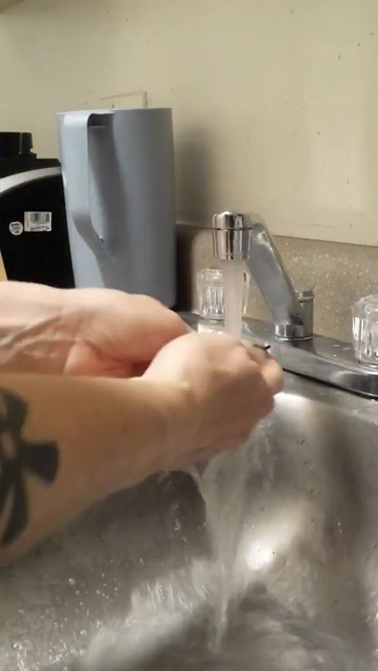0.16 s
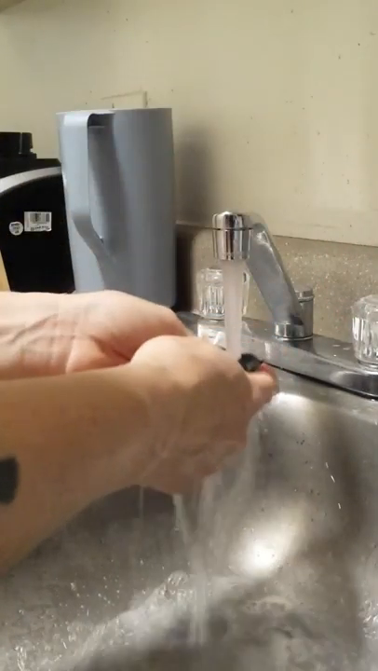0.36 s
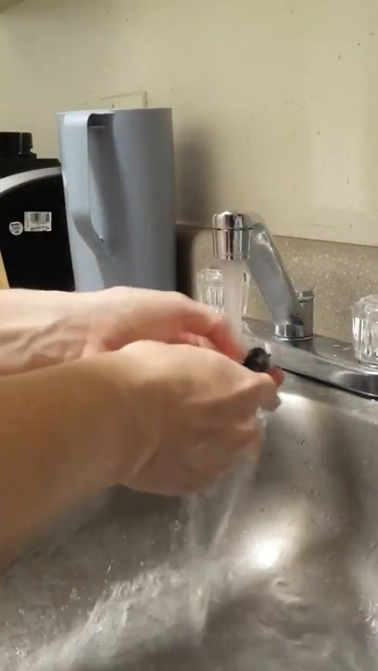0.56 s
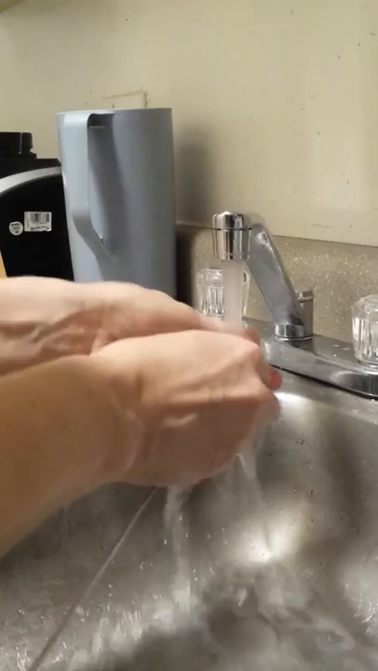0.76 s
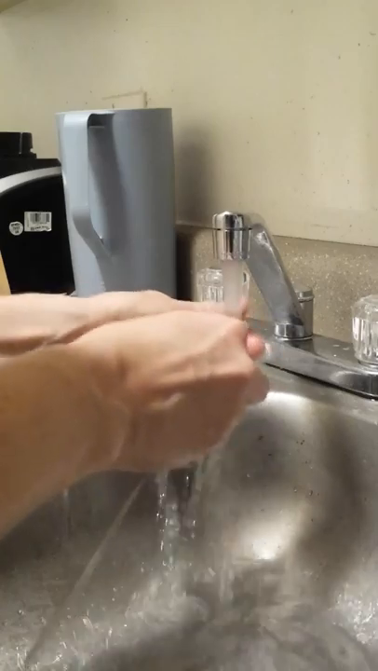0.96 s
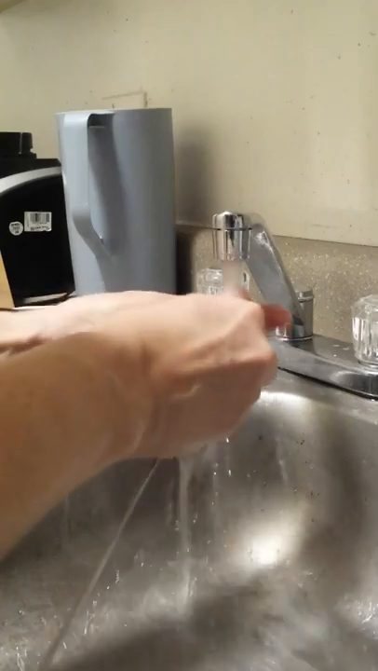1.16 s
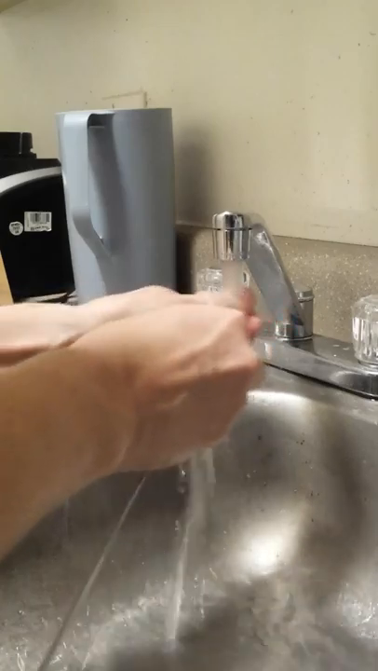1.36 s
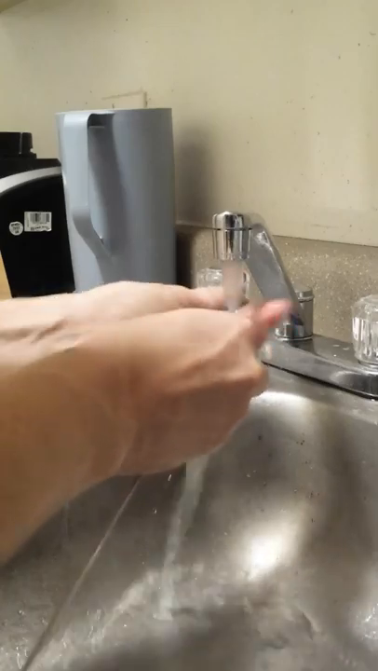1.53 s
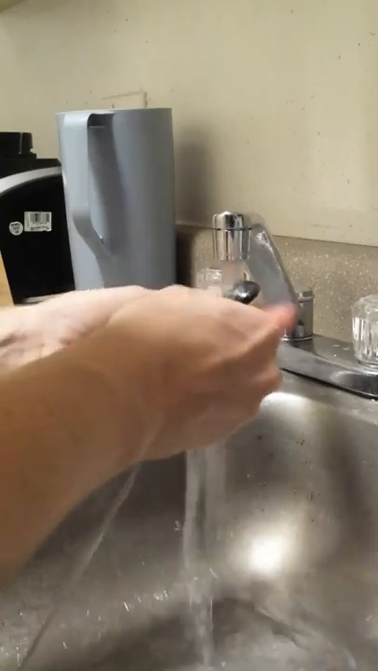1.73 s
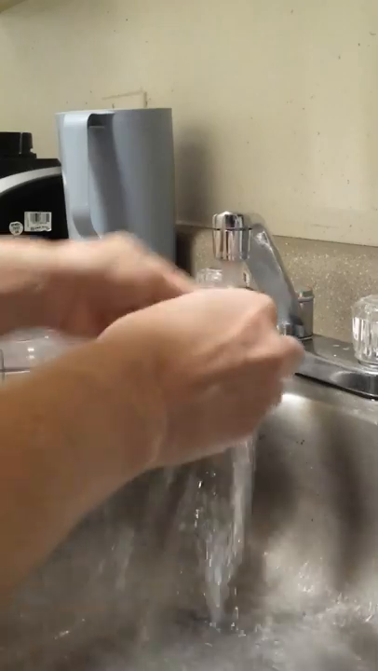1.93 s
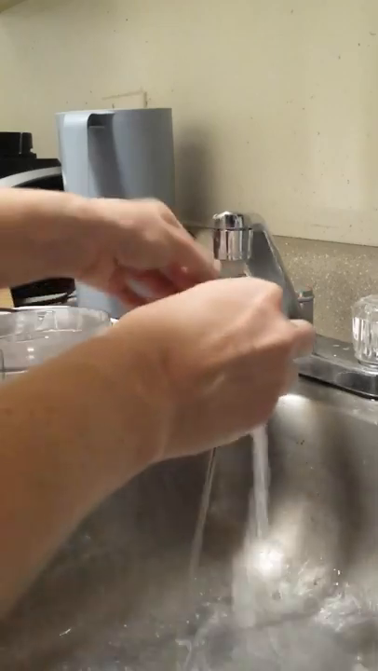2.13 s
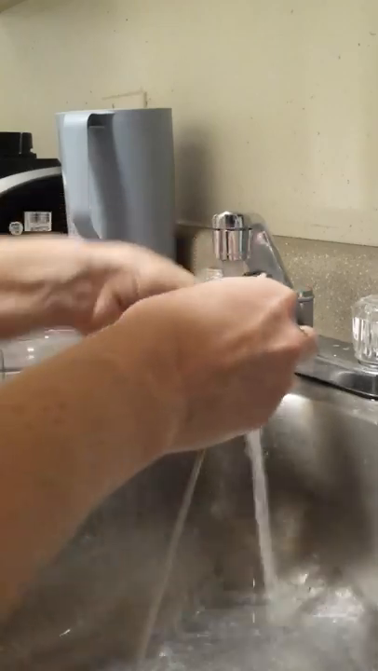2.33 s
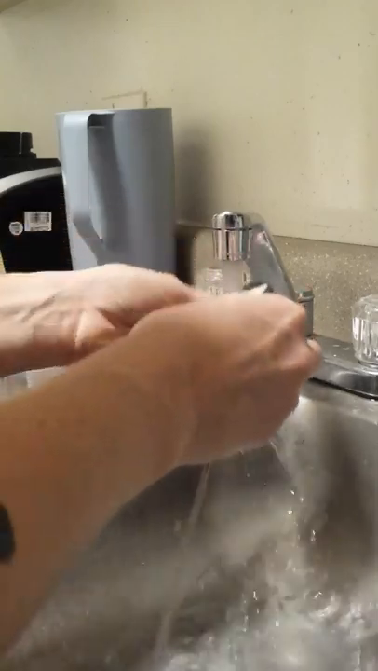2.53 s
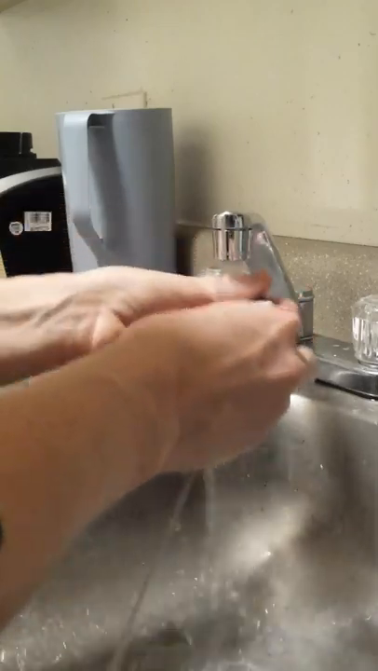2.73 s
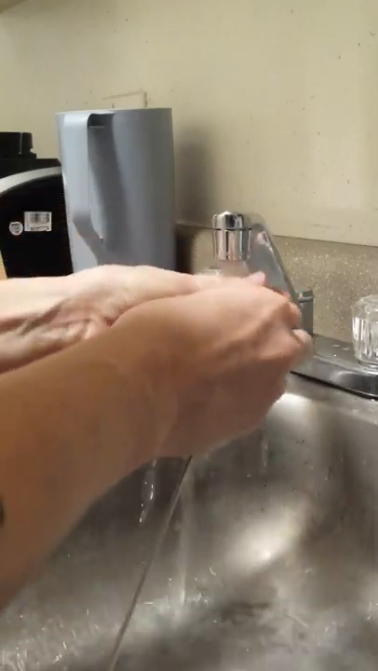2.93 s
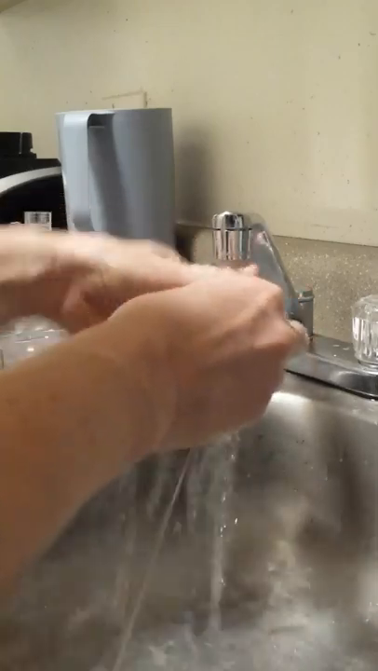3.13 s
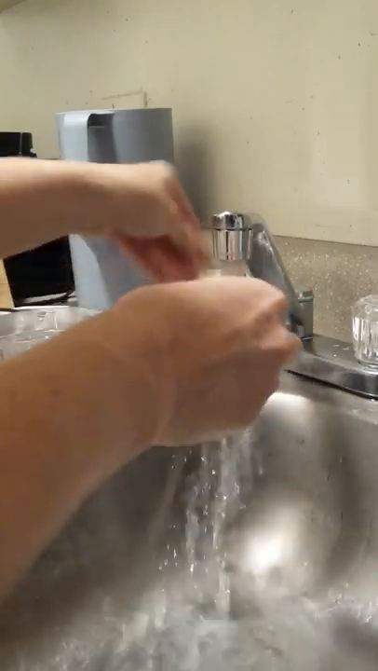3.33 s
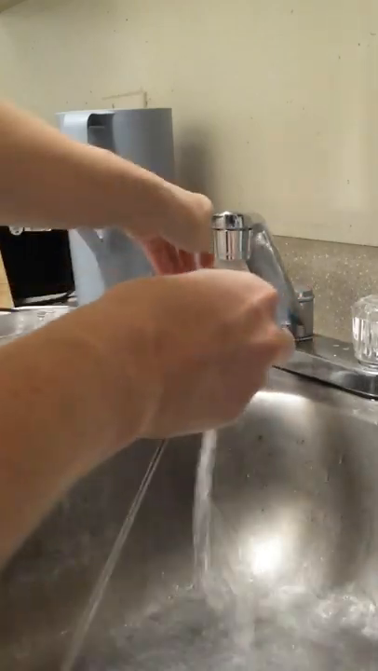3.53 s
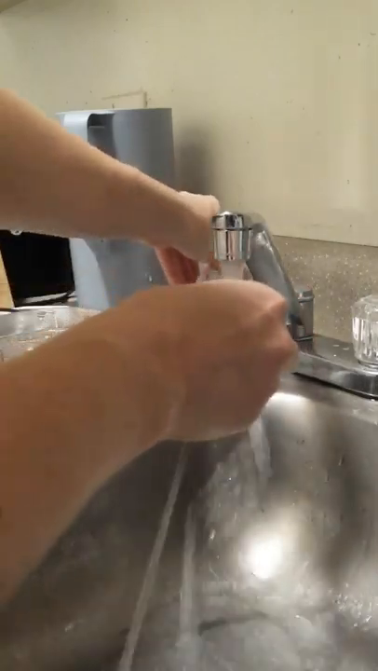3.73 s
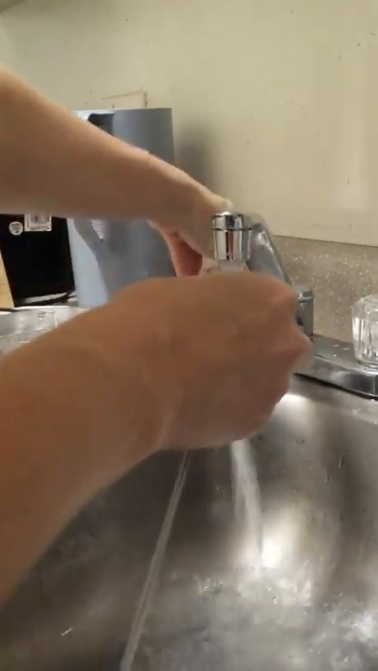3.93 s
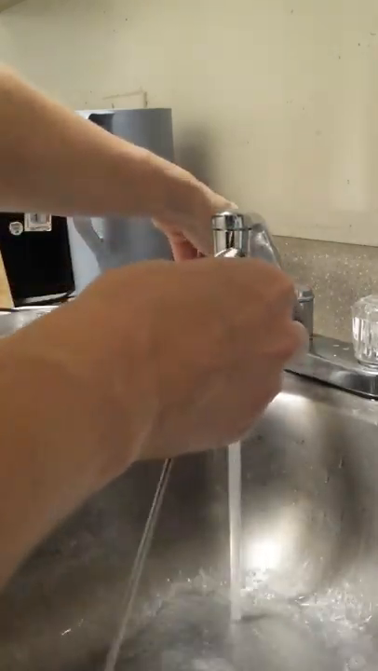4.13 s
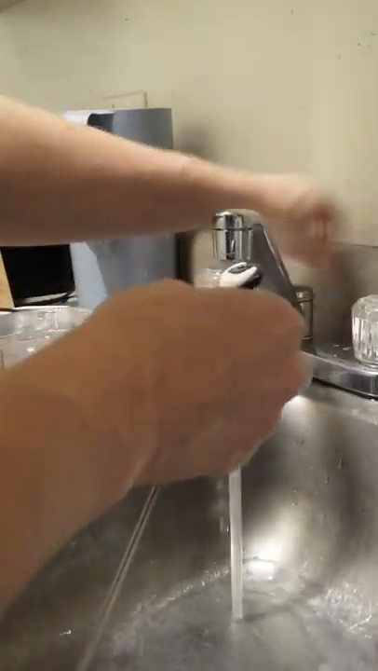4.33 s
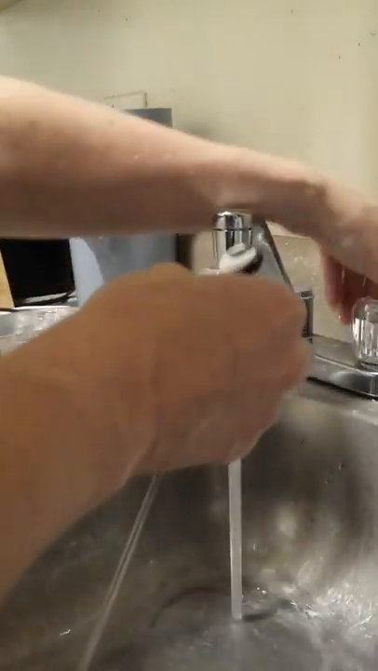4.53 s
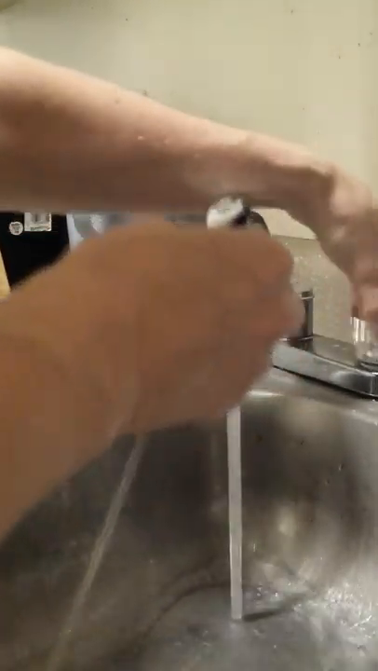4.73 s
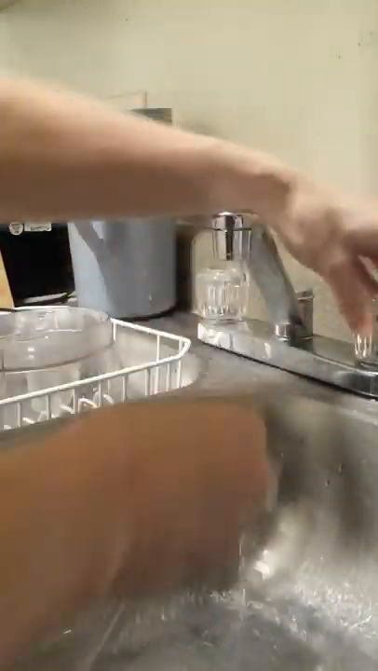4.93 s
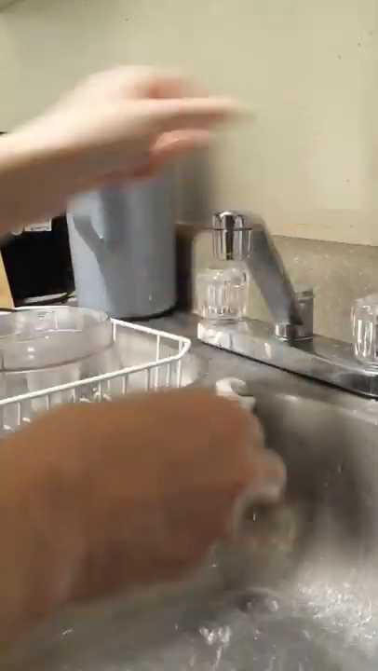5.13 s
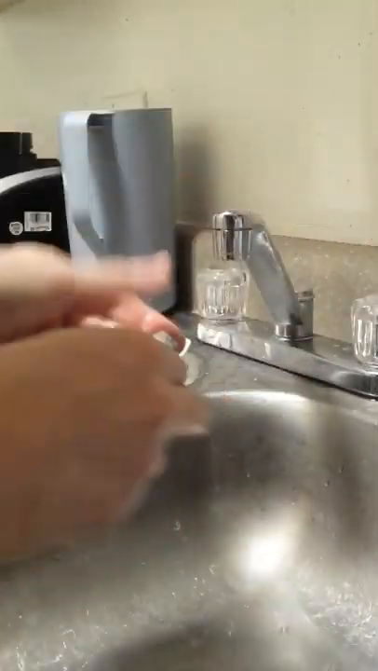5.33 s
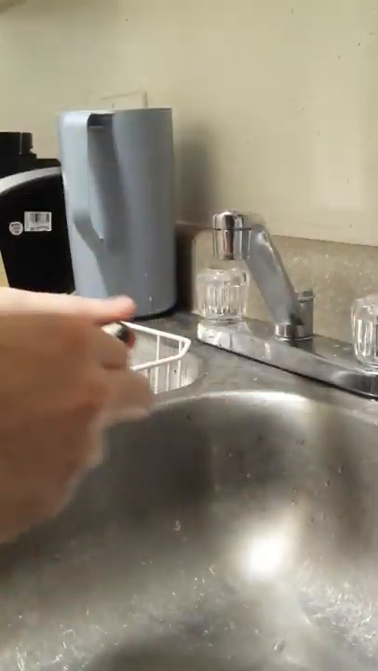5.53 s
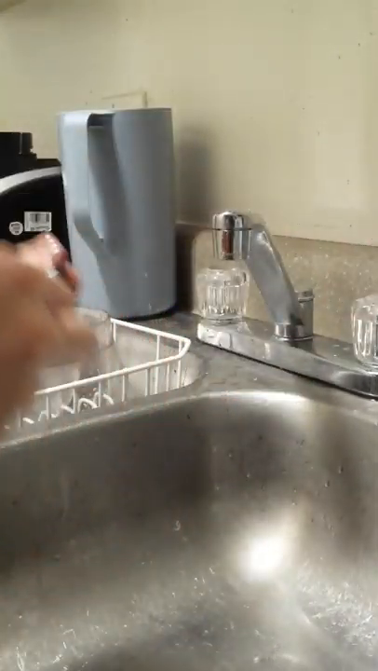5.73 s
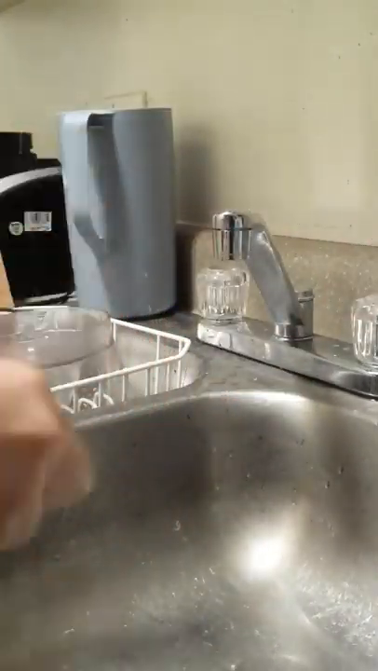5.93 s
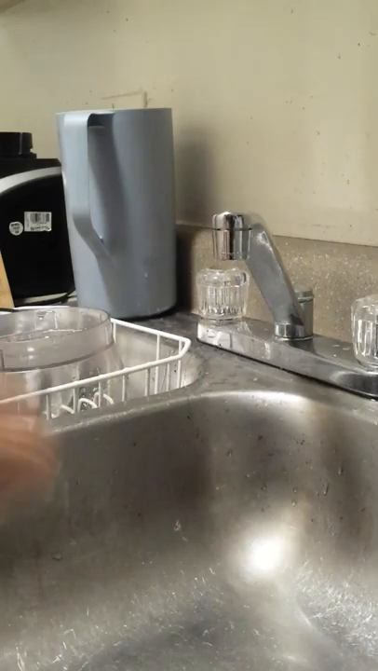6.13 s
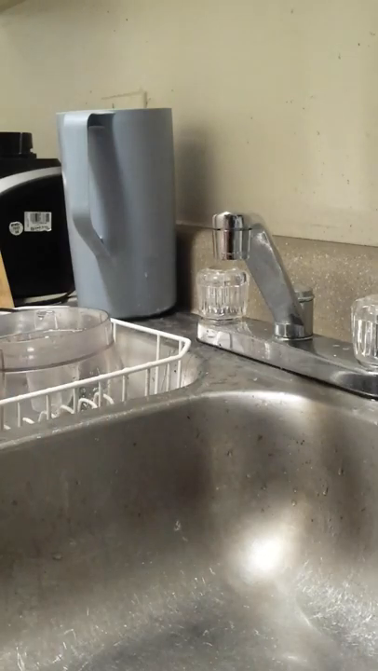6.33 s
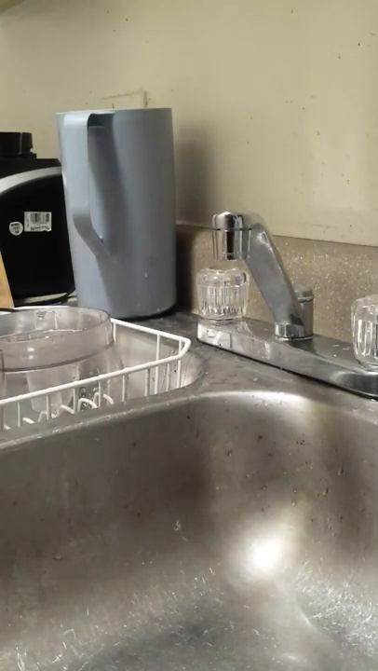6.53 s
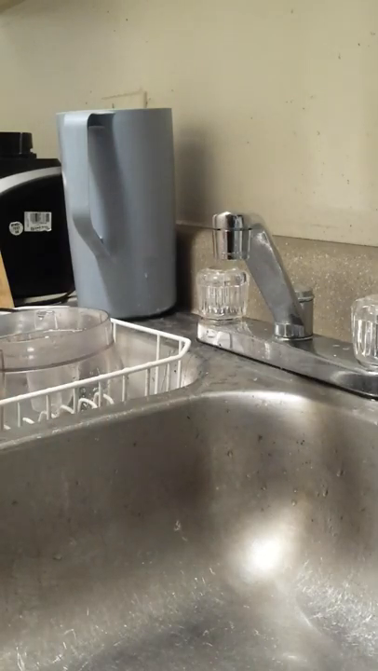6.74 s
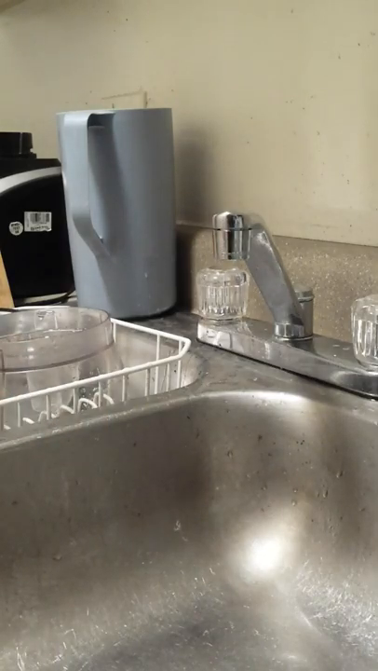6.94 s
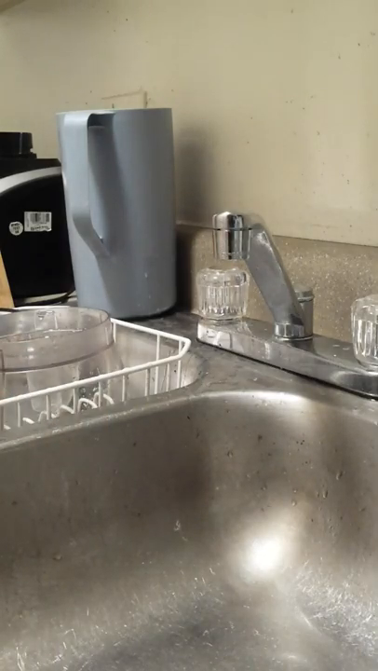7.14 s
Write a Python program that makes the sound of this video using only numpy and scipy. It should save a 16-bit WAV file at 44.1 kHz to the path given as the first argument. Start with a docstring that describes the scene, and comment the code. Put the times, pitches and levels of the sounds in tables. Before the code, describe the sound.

From the start, a kitchen tap pours loudly over hands rinsing small glass beads, breaking into crisp spray, irregular handfuls and sharp drops that slap a steel sink, with a low metallic drumming and little bubble plinks and gulps. From about 1.6 to 2.7 s the whole sound is turned down unevenly, with the splashing thinnest near 2.0 and 2.2 s, and it is full again by 3.0 s. From 3.3 s a freer stream adds a steady bright hiss; dull low knocks come at 3.7, 4.1, 4.3, 4.55 and 4.9 s. The water is shut off at about 4.95 s. A sharp tick and light clacks follow at 5.03 to 5.1 s, then a fizzing trickle fading by 6 s, sparse tiny drips, faint squeaks between 5.5 and 6 s, and a small clack at 6.9 s. A low, wavering appliance hum and soft room rush remain to 7.2 s. Close stereo, short basin reflections.

```python
"""A kitchen tap runs over two hands rinsing glass beads, filtered random drops surging into a steel sink.
Two microphone ports hear it directly, slightly later on the left, then off the basin and the kitchen.
Handfuls, drops and lumps fall as showers and cracks; trapped bubbles and dull knocks are damped sines.
The tap is shut after about five seconds; a sharp tick, small fizzing pings, drips and faint squeaks follow.
Wavering sine lines hum like an appliance over soft room noise; the recorder turns down at 1.6-2.7 s."""
import sys
import numpy as np
from scipy import signal
from scipy.fft import rfft, irfft, next_fast_len
from scipy.io import wavfile

SR = 44100
rng = np.random.default_rng(int(sys.argv[2]) if len(sys.argv) > 2 else 0)


def to_wav(s):
    """Save 16-bit WAV."""
    ch = np.atleast_2d(s).T  # columns
    pcm = np.round(np.clip(ch, -1, 1) * 32767)  # PCM
    wavfile.write(sys.argv[1], SR, pcm.astype(np.int16))


N = 316902
TIME = np.arange(N) / SR

# level of the running water over time, with the recorder turning down at 1.6-2.7 s: start_s, level_db
WATER_CURVE = [(0, 2), (1.2, 1.5), (1.55, -2.5), (1.73, -7.5), (1.92, -4.5), (2.22, -11.5), (2.62, -6),
               (3.0, 1), (3.5, 0), (3.85, -1), (4.1, 0.5), (4.65, 3), (4.92, -4)]
# handfuls of water that spill into the sink: start_s, level_db, length_s
HANDFULS = [(0.17, -21, 0.04), (0.458, -24.5, 0.057), (0.538, -23, 0.046), (0.768, -23.5, 0.023),
            (0.924, -20, 0.023), (1.096, -25, 0.033), (1.153, -21, 0.033), (1.327, -21.5, 0.037),
            (1.525, -28.5, 0.065), (1.604, -29.5, 0.056), (1.677, -23.5, 0.02), (1.802, -28.5, 0.053),
            (1.962, -29, 0.015), (2.054, -26, 0.071), (2.24, -30, 0.018), (2.405, -31, 0.12),
            (2.556, -30.5, 0.02), (2.641, -25, 0.016), (2.899, -26.5, 0.021), (2.974, -26.5, 0.035),
            (3.023, -23.5, 0.022), (3.245, -24.5, 0.058), (3.321, -18.5, .02), (3.365, -25, .03),
            (3.461, -20, 0.047), (3.499, -19.5, .022), (3.748, -22.5, .035), (4.257, -22.5, 0.022),
            (4.584, -23, 0.022), (4.734, -23, 0.037), (4.823, -25, 0.087), (4.926, -21, 0.032)]
# heavy single drops that slap the steel while the tap runs: start_s, level_db
HEAVY_DROPS = [(0.051, -2), (0.1030, 1), (0.464, -7), (0.3002, -2), (0.5435, -5), (0.6257, -1),
               (0.6681, -4), (0.7430, -4), (0.9063, 0), (0.9993, -2.5), (1.046, 2), (1.1445, -7),
               (1.174, -3), (1.27, 0), (1.3812, -1.5), (1.454, -0.5), (1.516, -12), (1.6022, 1.5),
               (1.682, -5.5), (1.7389, -15), (1.7814, -10), (2.4773, -8.5), (2.641, -2.5), (2.687, -1.5),
               (2.7372, -3), (2.8095, -8.5), (2.9503, -7), (3.3686, 2), (3.4281, -2), (3.578, -0.5),
               (3.7334, -3.5), (3.9962, -3), (4.0489, 3), (4.176, 1), (4.2423, -4.5), (4.305, -2),
               (4.3465, -7), (4.709, 0.5), (4.7978, 0), (4.8179, 1.5)]
# late drips, and at 5.03 s a sharp tick, perhaps a bead, with the clack: start_s, level_db
LATE_DRIPS_AND_TICK = [(5.0303, -10), (5.209, -14), (5.434, -20.5), (5.575, -23), (5.732, -21.5),
                       (5.77, -18.5), (5.8384, -22.5), (6.333, -28.5), (6.452, -23), (6.538, -21),
                       (6.667, -22), (7.047, -20)]
# the clearest bright bubbles: start_s, level_db, pitch_hz
BRIGHT_BUBBLES = [(0.101, -18.5, 3150), (0.233, -17, 4230), (0.345, -16.5, 3200), (0.55, -17.5, 3100),
                  (1.339, -17, 2820), (1.529, -21, 3640), (2.177, -29.5, 3240), (2.833, -12, 3380),
                  (3.324, -17, 3230), (3.477, -21.5, 2030), (3.504, -14, 4400), (5.23, -20.5, 3350),
                  (5.285, -31.5, 2830)]
# deep bubbles and gulps, and at 4.9 s the deep ring of the valve's thunk: start_s, level_db, pitch_hz
DEEP_BUBBLES = [(1.795, -28.5, 805), (2.335, -26, 1250), (3.028, -21, 785), (3.239, -18.5, 780),
                (3.282, -22.5, 750), (3.394, -17, 786), (4.03, -24.5, 930), (4.898, -15, 836),
                (6.04, -37.5, 794)]
# dull knocks of hand, valve and pipe: start_s, level_db, pitch_hz
DULL_KNOCKS = [(3.659, -25, 118), (4.075, -20.5, 85), (4.088, -19, 139), (4.319, -20, 150),
               (4.541, -22, 135), (4.585, -21, 156), (4.896, -16, 161)]
# light clacks of things being handled: start_s, level_db, t60_s
LIGHT_CLACKS = [(5.029, -40, 0.09), (5.064, -41.5, 0.11), (5.092, -46.5, 0.12), (6.881, -45, 0.35)]
# faint squeaks of wet beads and fingers: start_s, level_db, pitch_hz
BEAD_SQUEAKS = [(5.465, -51, 2950), (5.54, -49, 3450), (5.588, -45, 3720), (5.82, -48, 3340),
                (6.02, -53, 3530)]
# colour of the fine spray: pitch_hz, level_db (per Hz)
SPRAY_COLOUR = [(5000, -0.5), (7000, 10.5), (9000, 3.5), (11500, 3.5), (14500, 3)]
# colour of the coarser splashes: pitch_hz, level_db (per Hz)
SPLASH_COLOUR = [(1300, 0.5), (2000, -5), (2500, -10), (3100, 2.5), (4000, 0), (5000, -6)]
# colour of the drumming steel: pitch_hz, level_db (per Hz)
DRUM_COLOUR = [(60, -62), (125, 0), (200, -6), (260, -14), (340, 3), (410, -13.5), (520, 6.5), (680, -4.5),
               (810, -0.5), (1150, 1)]
# colour of the unbroken stream: pitch_hz, level_db (per Hz)
STREAM_COLOUR = [(2500, -22), (4500, -16), (6800, 11), (9000, 5), (14500, -2)]
# colour of the showers from spilled handfuls: pitch_hz, level_db (per Hz)
SPATTER_COLOUR = [(3100, -3), (4800, -5.5), (7000, 5), (9500, 1.5), (13500, -3)]
# colour of the room's soft rush: pitch_hz, level_db (per Hz)
ROOM_COLOUR = [(30, -6.5), (70, 0), (125, 10), (190, 6.5), (295, 10.5), (355, 14), (410, 3.5), (700, -0.5),
               (1100, -8.5), (2000, -12.5), (5000, -16.5), (14000, -16.5)]
# lines of the appliance hum: pitch_hz, level_db
HUM_LINES = [(123.6, -55.5), (156, -66), (247.6, -74), (311, -62.5)]
# level of hum and room over time, turned down along with the water: start_s, level_db
BACKGROUND_CURVE = [(0, 8), (1.58, 2.5), (1.75, -3), (2.3, -8), (2.9, 4), (7.19, 7)]
# resonances of the left microphone port: pitch_hz, q (no unit), level_db
LEFT_RESONANCES = [(809, 1.67, 26), (1180, 0.88, -13.5), (6450, 0.6, 8), (13630, 0.44, -23),
                   (13800, 1.8, 2)]
# resonances of the right microphone port: pitch_hz, q (no unit), level_db
RIGHT_RESONANCES = [(826, 13, -18), (7446, 2.33, 10)]

# spray, splash and drumming: level at 0 dB of water level, and dB gained per dB of it
SPRAY_DB, SPRAY_FOLLOWS = -29, 0.98
SPLASH_DB, SPLASH_FOLLOWS = -37.5, 0.92
DRUM_DB, DRUM_FOLLOWS = -39, 0.99
# the stream wanders, so each spot is hit harder and softer in turn
WANDER_DB, WANDER_PER_S = 2.5, 35
# the hands cup the water for a moment
CUP_S, CUP_LENGTH_S, CUP_DB = 2.016, 0.033, -7
# water pools in the hands before each spill: for how long, and how far the splashing thins
GATHER_S, GATHER_DB = 0.025, -1
# the tap is shut and the stream dies quickly; the film left in the sink runs off slowly
SHUT_S, SHUT_DB_PER_S = 4.95, 155
RUNOFF_DB, RUNOFF_DB_PER_S = -12.5, 10.5
# the unbroken stream: when the hands free it, how quickly, and its level
FREE_S, FREE_RISE_S, STREAM_DB = 3.3, 0.8, -36.5
FREE_CALM_DB = -3  # unbroken, it drums less and sheds weaker lumps and bubbles
# lesser lumps keep falling at uneven gaps, their strength following the water level
LUMP_GAP_S, LUMP_UNEVEN, LUMP_DB, LUMP_SPREAD_DB = 0.04, 0.8, -7, 2.1
LUMP_HZ, LUMP_OCTAVES = 8550, 0.36  # their pitch and its scatter
SLAP_HZ, DROP_OCTAVES = 7480, 0.089  # pitch of a heavy drop and its scatter
# every drop: its first crack, its share of reflections, and the droplets that it throws up
CRACK_DB, DROP_WET_DB = -10.5, -5
DROPLETS_PER_S, DROPLETS_DB, DROPLETS_T60_S = 1500, -4, 0.033
# lesser bright bubbles and gulps, trapped at random while the tap runs
PLINKS_PER_S, PLINK_DB, PLINK_HZ, PLINK_OCTAVES = 5, -25, 3340, 0.17
GULPS_PER_S, GULP_DB, GULP_HZ, GULP_OCTAVES = 13, -30, 808, 0.09
# the trickle after the tap is shut: length, level, pitch and its scatter
TRICKLE_S, TRICKLE_DB, TRICKLE_HZ, TRICKLE_OCTAVES = 0.96, -35, 7270, 0.23
THUD_DB, THUD_HZ = 1, 325  # the short, broad contact of each knock, against the knock's level
CLACK_BASIN_HZ, CLACK_BASIN_DB = 793, 9  # a clack sets the basin ringing: level against the clack
# reflections: decay time, and level against the direct path
BASIN_T60_S, BASIN_DB, KITCHEN_T60_S, KITCHEN_DB = 0.058, 0, 0.3, -1.5
CUTOFF_HZ = 14450  # top of the recorded band


def running_water():
    """The broken stream arrives in surges: fine spray, coarser splashes and a drumming of the steel."""
    water_db = water_level()
    splashing_db = water_db + cupping() + gathering()
    surge = surges(per_s=75, t60=0.015, steady=0.38)
    spray = grains(SPRAY_COLOUR, per_s=2600, cycles=13.0, spread_db=5.5, surge=surge, count=24)
    # splash and steel follow the surges only weakly
    splash = grains(SPLASH_COLOUR, per_s=380, cycles=10.7, spread_db=3.0, surge=surge ** 0.23, count=14)
    drum = grains(DRUM_COLOUR, per_s=1800, cycles=6.3, spread_db=1.5, surge=surge ** 0.26, count=18)
    spray_gain = from_db(SPRAY_DB + SPRAY_FOLLOWS * splashing_db)
    splash_gain = from_db(SPLASH_DB + SPLASH_FOLLOWS * splashing_db)
    drum_gain = from_db(DRUM_DB + DRUM_FOLLOWS * water_db + FREE_CALM_DB * freed())
    return (spray_gain * high_pass(spray, hz=2960)
            + splash_gain * high_pass(splash, hz=800)
            + drum_gain * high_pass(drum, hz=67.6))


def free_stream():
    """Once the hands move aside, the aerated stream hits the steel whole and hisses until the tap is shut."""
    return from_db(STREAM_DB + water_level() + gathering()) * freed() * coloured(STREAM_COLOUR)


def water_level():
    """Level of the running water as recorded, in dB: the stream until the tap is shut, then the run-off."""
    since_shut = np.maximum(TIME - SHUT_S, 0)
    dying_db = -SHUT_DB_PER_S * since_shut
    runoff_db = RUNOFF_DB - RUNOFF_DB_PER_S * since_shut
    return in_time(WATER_CURVE)[0] + np.maximum(dying_db, runoff_db)


def freed():
    """Share of the stream that falls past the hands unbroken, 0-1."""
    return np.clip((TIME - FREE_S) / FREE_RISE_S, 0, 1) * (TIME < SHUT_S + 0.1)


def cupping():
    """The splashing drops while the hands hold the water, in dB."""
    return CUP_DB * np.exp(-((TIME - CUP_S) / CUP_LENGTH_S) ** 4)


def gathering():
    """Before each handful or heavy drop, water pools in the hands and the splashing thins, in dB."""
    pooled = np.zeros((1, N))
    swell = np.sqrt(np.hanning(int(GATHER_S * SR)))[None]
    for start_s, *_ in [*HANDFULS, *HEAVY_DROPS]:
        add(pooled, start_s - GATHER_S, swell)
    return GATHER_DB * np.minimum(pooled[0], 1)


def surges(per_s, t60, steady):
    """Small lumps of water land at random; each starts a shower that dies away."""
    lumps = (rng.random(N) < per_s / SR) * rng.uniform(0.08, 1, N)
    return rms_one(steady + signal.oaconvolve(lumps, fade(t60))[:N])


def grains(colour, per_s, cycles, spread_db, surge, count, wet_db=0):
    """Random drops on spots that each ring at a pitch of their own; rms 1."""
    out = np.zeros((2, N))
    for hz in np.geomspace(colour[0][0], colour[-1][0], count):
        born = np.flatnonzero(rng.random(N) < per_s / count / SR)
        size, sign = rng.random((2, len(born)))
        size_db = spread_db * np.minimum(-np.log(1 - size), 4)
        wander_db = WANDER_DB * drift(WANDER_PER_S, born / SR)
        drops = np.zeros(N)
        drops[born] = from_db(size_db + wander_db) * np.sign(sign - 0.5)
        rings = rms_one(signal.oaconvolve(drops * surge, ping(hz, cycles))[:N])
        # the spots lie at even pitch ratios, so each stands for a band as wide as its pitch
        band_gain = from_db(at_hz(colour, hz)) * np.sqrt(hz)
        out += band_gain * in_sink(rings, hz, wet_db)[:, :N]
    return rms_one(out)


def splats():
    """A handful of water lands as a shower of coarse droplets that lasts as long as it pours."""
    pouring = np.zeros((1, N))
    for start_s, level_db, length_s in HANDFULS:
        thinning = np.sqrt(np.linspace(1, 0, int(length_s * SR) + 2))
        add(pouring, start_s, from_db(level_db) * thinning[None])
    shower = grains(SPATTER_COLOUR, per_s=1300, cycles=8.9, spread_db=3.0, surge=pouring[0], count=12,
                    wet_db=DROP_WET_DB)
    return np.sqrt(np.mean(pouring ** 2)) * shower


def drops_drips_and_tick():
    """Heavy drops and lesser lumps slap the steel; the late drips and a sharp tick each add a small ring."""
    out = np.zeros((2, N))
    for start_s, level_db in HEAVY_DROPS:
        hz = SLAP_HZ * 2 ** (DROP_OCTAVES * rng.standard_normal())
        add(out, start_s, drop(level_db, hz))
    for start_s, water_db, size in while_running(LUMP_GAP_S, LUMP_UNEVEN):
        hz = LUMP_HZ * 2 ** (LUMP_OCTAVES * rng.standard_normal())
        add(out, start_s, drop(LUMP_DB + water_db + LUMP_SPREAD_DB * size, hz))
    for start_s, level_db in LATE_DRIPS_AND_TICK:
        add(out, start_s, drop(level_db, SLAP_HZ, droplets_db=4.0, droplets_t60=0.087))
        ring = ping(6950, cycles=130, rise=0.033)
        add(out, start_s, from_db(level_db - 13) * in_sink(ring, SLAP_HZ))
    return out


def drop(level_db, hz, droplets_db=DROPLETS_DB, droplets_t60=DROPLETS_T60_S):
    """A sharp crack and a short ring, followed by the few droplets that it throws up."""
    hz = min(hz, CUTOFF_HZ)
    decay = fade(droplets_t60)
    chance, size = rng.random((2, len(decay)))
    droplets = (chance < DROPLETS_PER_S / SR) * (size - 0.5) * decay
    spatter = np.convolve(droplets, ping(np.sqrt(hz * SLAP_HZ), cycles=3.3, swell=0.35))
    hit = from_db(droplets_db) * energy_one(high_pass(spatter, hz=2640))
    slap = energy_one(ping(hz, cycles=14.6, swell=7.9))
    hit[:len(slap)] += slap[:len(hit)]
    hit[0] += from_db(CRACK_DB)
    return from_db(level_db) * in_sink(high_pass(hit, hz=1500), hz, wet_db=DROP_WET_DB)


def while_running(gap_s, uneven):
    """Chance events at uneven gaps until the tap is shut: start_s, water_db, a random trait of spread 1."""
    times = np.cumsum(gap_s * (1 + uneven * rng.uniform(-1, 1, size=256)))
    strength_db = water_level() + cupping() + gathering() + FREE_CALM_DB * freed()
    rows = np.transpose([times, np.interp(times, TIME, strength_db), rng.standard_normal(size=256)])
    return rows[times < SHUT_S]


def bubbles():
    """Trapped air rings briefly: small pockets pop and ring, two lesser rings follow; large ones gulp."""
    out = np.zeros((2, N))
    lesser_gulps = lesser_bubbles(GULPS_PER_S, GULP_DB, GULP_HZ, GULP_OCTAVES)
    for start_s, level_db, hz in [*DEEP_BUBBLES, *lesser_gulps]:
        gulp = ping(hz, cycles=12.8, rise=0.029, swell=0.57)
        add(out, start_s, from_db(level_db) * in_sink(gulp, hz))
    lesser_plinks = lesser_bubbles(PLINKS_PER_S, PLINK_DB, PLINK_HZ, PLINK_OCTAVES)
    for start_s, level_db, hz in [*BRIGHT_BUBBLES, *lesser_plinks]:
        pop = ping(hz, cycles=2.4)
        add(out, start_s, from_db(level_db) * in_sink(pop, hz))
        for k, detune in enumerate([1, *rng.uniform(0.876, 1.29, 2)]):
            ring = ping(hz * detune, cycles=24.6, rise=0.31, swell=0.33)
            add(out, start_s + k * 0.0043, from_db(level_db - 1.9 * k) * in_sink(ring, hz))
    return out


def lesser_bubbles(per_s, level_db, hz, octaves):
    """Air trapped at random, louder and softer with the running water: start_s, level_db, pitch_hz."""
    return [(start_s, level_db + water_db, hz * 2 ** (octaves * pitch))
            for start_s, water_db, pitch in while_running(1 / per_s, uneven=1)]


def draining(count=200):
    """Tiny bubbles burst thickly, a soft trickle, as the last film of water runs off."""
    out = np.zeros((2, N))
    for when, size, pitch in zip(*rng.random((2, count)), rng.standard_normal(count)):
        hz = min(TRICKLE_HZ * 2 ** (TRICKLE_OCTAVES * pitch), CUTOFF_HZ)
        level_db = TRICKLE_DB - 11.6 * size - 4 * when
        bubble = from_db(level_db) * ping(hz, cycles=55, rise=0.04)
        add(out, SHUT_S + TRICKLE_S * when, in_sink(bubble, hz))
    return out


def handling():
    """Knocks boom as a thud, a low mode and a weaker overtone; clacks scatter and ring the basin."""
    out = np.zeros((2, N))
    for start_s, level_db, hz in DULL_KNOCKS:
        low_mode = in_sink(ping(hz, cycles=12.7, swell=1.0), hz, wet_db=-4.5)
        overtone = in_sink(ping(hz * 1.26, cycles=10.7, swell=0.9), hz, wet_db=-1.5)
        thud = in_sink(ping(THUD_HZ, cycles=2.3), THUD_HZ)
        add(out, start_s, from_db(level_db) * low_mode)
        add(out, start_s, from_db(level_db - 8.0) * overtone)
        add(out, start_s, from_db(level_db + THUD_DB) * thud)
    dull = signal.butter(1, 4200, fs=SR, output="sos")
    for start_s, level_db, t60_s in LIGHT_CLACKS:
        scatter = rms_one(signal.sosfilt(dull, echoes(t60_s, alike=0.22)))
        basin_ring = in_sink(ping(CLACK_BASIN_HZ, cycles=14), CLACK_BASIN_HZ)
        add(out, start_s, from_db(level_db) * scatter)
        add(out, start_s, from_db(level_db + CLACK_BASIN_DB) * basin_ring)
    return out


def squeaks(length_s=0.06):
    """Wet skin slips on glass in a brief, unsteady tone that swells and fades."""
    out = np.zeros((2, N))
    swell = np.hanning(int(length_s * SR)) ** 2
    for start_s, level_db, hz in BEAD_SQUEAKS:
        pitch_hz = hz * (1 + 0.031 * drift(251)[:len(swell)])
        tone = swell * np.sin(2 * np.pi * np.cumsum(pitch_hz) / SR)
        add(out, start_s, from_db(level_db) * in_sink(tone, hz))
    return out


def background():
    """An appliance hums with slightly wavering lines over the soft rush of the room."""
    rush = from_db(-51.0) * coloured(ROOM_COLOUR)
    hum = 0
    for line_hz, level_db in HUM_LINES:
        waver_db = 2.5 * drift(9)
        waver_phase = 0.8 * drift(8)
        line = np.sqrt(2) * np.sin(2 * np.pi * line_hz * TIME + waver_phase)
        hum = hum + from_db(level_db + waver_db) * line
    return from_db(in_time(BACKGROUND_CURVE)[0]) * (rush + from_db(1.0) * hum)


def coloured(spectrum):
    """Stereo noise from all sides, rms 1: long waves reach both ports alike."""
    size = next_fast_len(N, True)
    hz = np.maximum(np.arange(size // 2 + 1) * SR / size, 1)
    alike = np.clip(1.15 / (1 + (hz / 800) ** 2), 0, 1)
    mid, side = rfft(rng.standard_normal((2, size))) * from_db(at_hz(spectrum, hz))
    both = np.sqrt(1 + alike) * mid + np.sqrt(1 - alike) * side * [[1], [-1]]
    return rms_one(irfft(both, size)[:, :N])


def in_sink(x, hz, wet_db=0):
    """Sound from one spot: the direct path, a little later on the left, the steel walls, the kitchen."""
    alike = np.clip(0.44 / (1 + (hz / 650) ** 2), 0, 1)
    paths = np.zeros((2, SR // 6), "float32")
    add(paths, 0, from_db(BASIN_DB + wet_db) * echoes(BASIN_T60_S, alike))
    add(paths, 0, from_db(KITCHEN_DB + wet_db) * echoes(KITCHEN_T60_S, alike))
    paths[0, rng.integers(1, 15)] += 1  # left port, up to a third of a millisecond late
    paths[1, 0] += 1
    return signal.oaconvolve(x[None].astype("float32"), paths, axes=1)


def echoes(t60, alike):
    """Dense stereo reflections of energy 1 that build up within a millisecond."""
    decay = fade(t60)[:SR // 6]
    mid, side = rng.standard_normal((2, len(decay)))
    tail = (np.sqrt(1 + alike) * mid + np.sqrt(1 - alike) * side * [[1], [-1]]) * decay
    tail = tail * np.minimum(TIME[:len(decay)] / 0.001, 1)
    return rms_one(tail) / np.sqrt(len(decay))


def ping(hz, cycles, rise=0., swell=0.45):
    """A damped sine that builds up over swell cycles; a bubble's pitch rises as it nears the surface."""
    decay = fade(cycles / hz)
    turns = np.cumsum(hz * (1 + rise * np.linspace(0, 1, len(decay)))) / SR
    return decay * (1 - np.exp(-turns / swell)) * np.sin(2 * np.pi * turns)


def fade(t60):
    """An exponential decay down to -60 dB."""
    return from_db(-60 * np.arange(int(t60 * SR) + 2) / (t60 * SR))


def drift(rate, when=TIME):
    """Straight lines between normal random values, rate of them a second."""
    return np.interp(when * rate, np.arange(4096), rng.standard_normal(4096))


def high_pass(x, hz):
    """Second-order low cut."""
    return signal.sosfilt(signal.butter(2, hz, "high", fs=SR, output="sos"), x)


def add(out, start_s, sound):
    """Mix a sound in from start_s."""
    start = max(int(start_s * SR), 0)
    out[:, start:start + sound.shape[1]] += sound[:, :N - start]


def from_db(db):
    """Decibels to gain."""
    return 10 ** (np.asarray(db) / 20)


def rms_one(x):
    """Scale to rms 1."""
    return x / np.sqrt(np.mean(x ** 2) + 1e-20)


def energy_one(x):
    """Scale a short sound to energy 1."""
    return x / np.sqrt(np.sum(x ** 2) + 1e-20)


def in_time(rows):
    """Each column of a curve at every sample."""
    start_s, *columns = np.transpose(rows)
    return [np.interp(TIME, start_s, column) for column in columns]


def at_hz(points, hz):
    """Read a spectrum on a log-frequency axis."""
    pitch_hz, level_db = np.transpose(points)
    return np.interp(np.log(hz), np.log(pitch_hz), level_db)


def scene():
    """Everything that sounds at the sink, from the water to the room behind it."""
    water = running_water() + free_stream() + splats() + drops_drips_and_tick() + bubbles() + draining()
    return water + handling() + squeaks() + background()


def port(x, resonances):
    """A microphone port colours the sound through a chain of peaks and dips."""
    for hz, q, gain_db in resonances:
        w = 2 * np.pi * min(hz, 0.45 * SR) / SR
        g = from_db(gain_db / 2)
        width = np.sin(w) / (2 * q)
        top = [1 + width * g, -2 * np.cos(w), 1 - width * g]
        bottom = [1 + width / g, -2 * np.cos(w), 1 - width / g]
        x = signal.lfilter(top, bottom, x)
    return x


def record(dry):
    """The left port sounds hollow, the right one sharp; peaks are rounded and the top is cut."""
    ports = np.array([port(dry[0], LEFT_RESONANCES), port(dry[1], RIGHT_RESONANCES)])
    heard = np.tanh(ports)
    return signal.sosfilt(signal.ellip(10, 0.3, 75, CUTOFF_HZ, fs=SR, output="sos"), heard)


dry = scene()
out = record(dry)
to_wav(out)
```